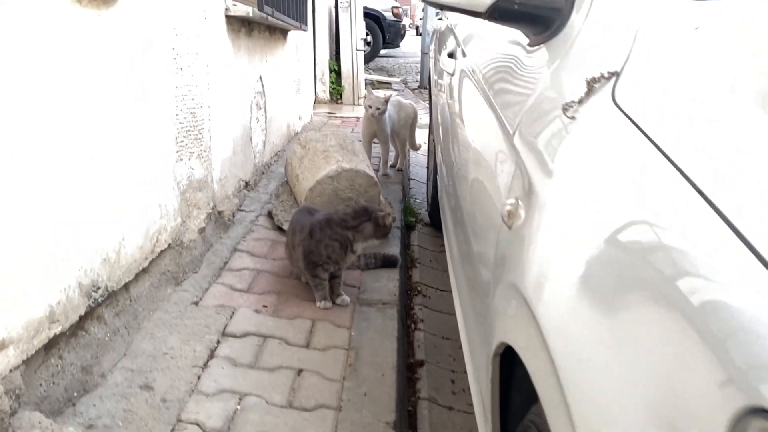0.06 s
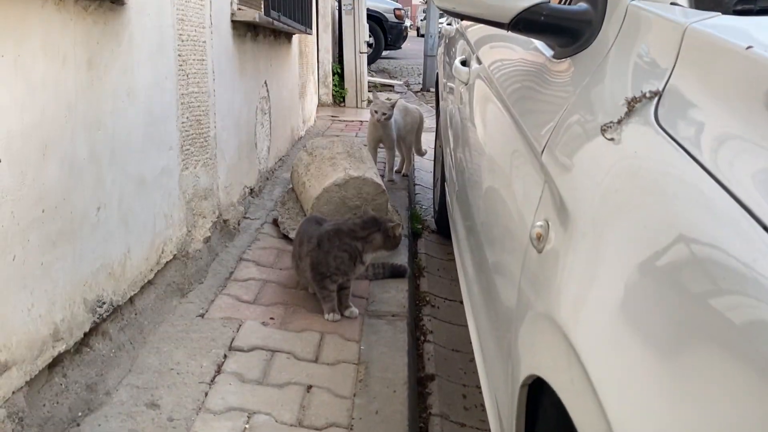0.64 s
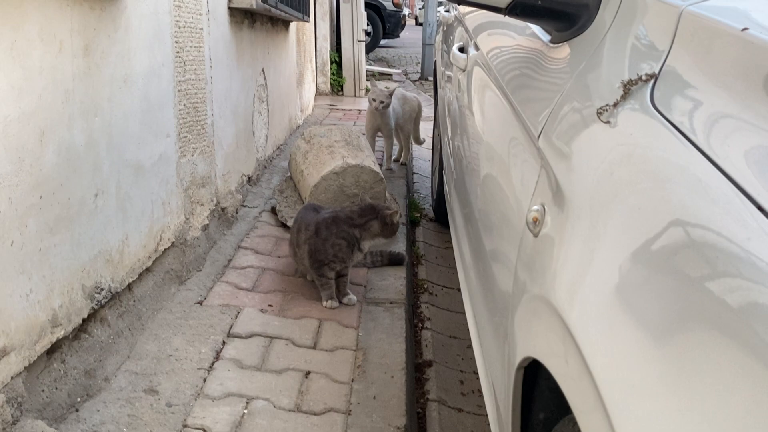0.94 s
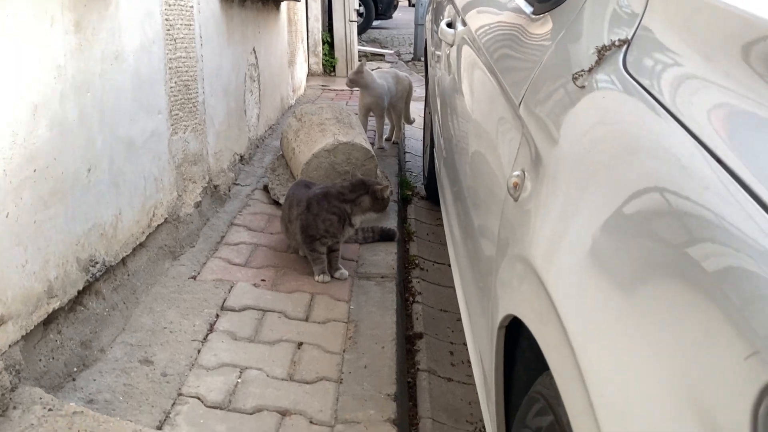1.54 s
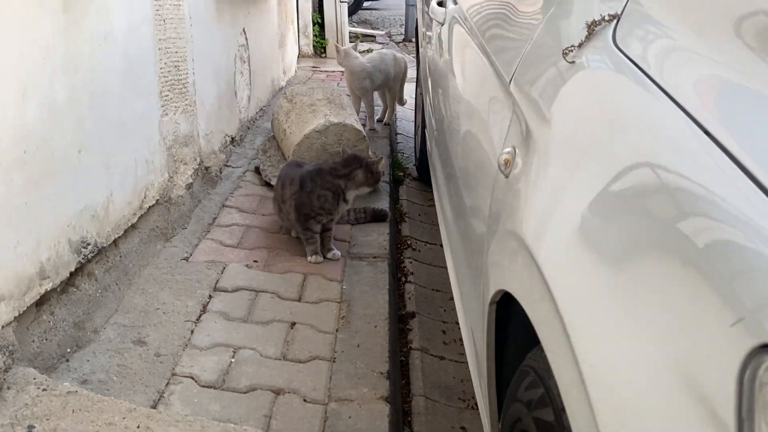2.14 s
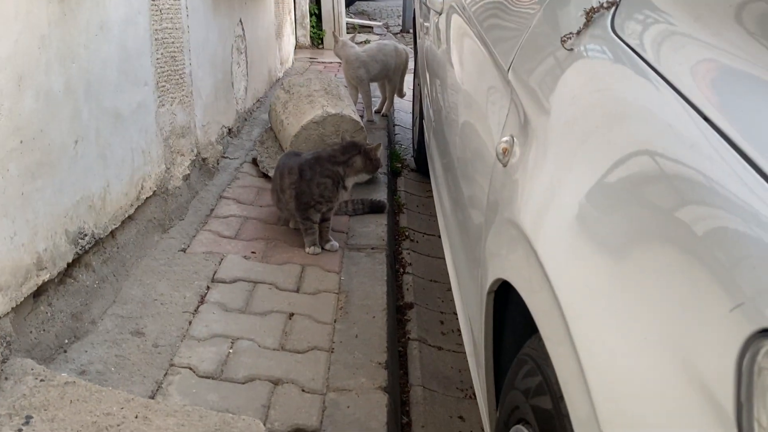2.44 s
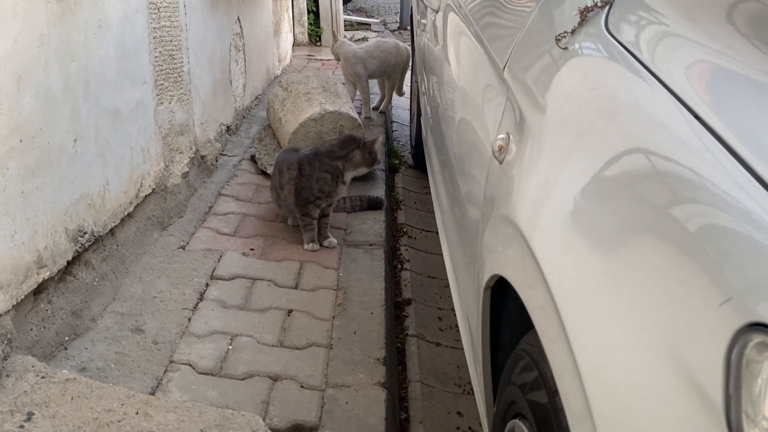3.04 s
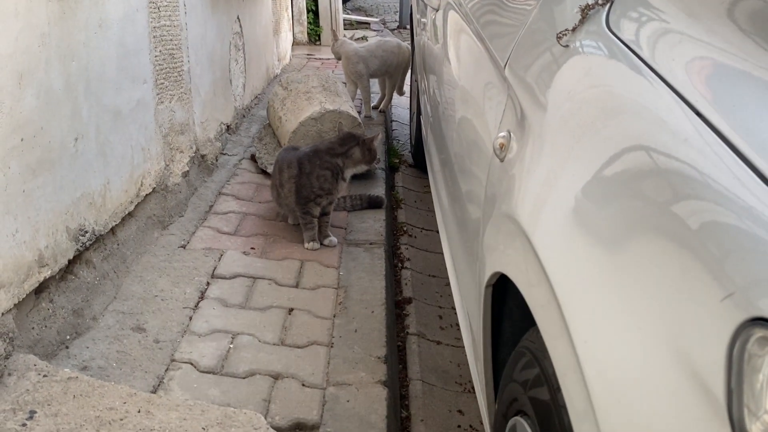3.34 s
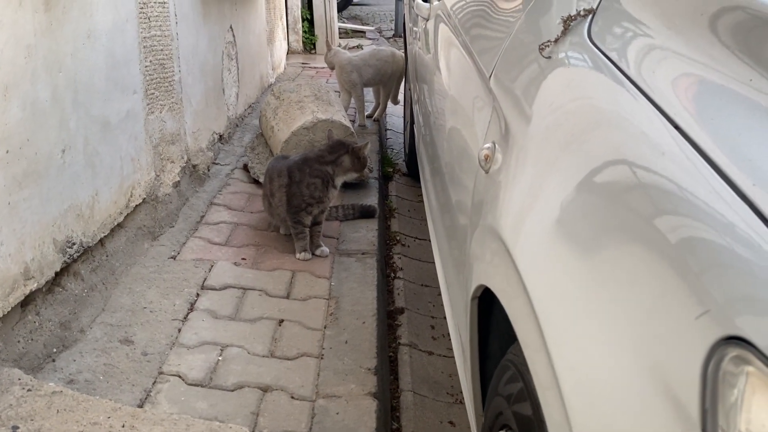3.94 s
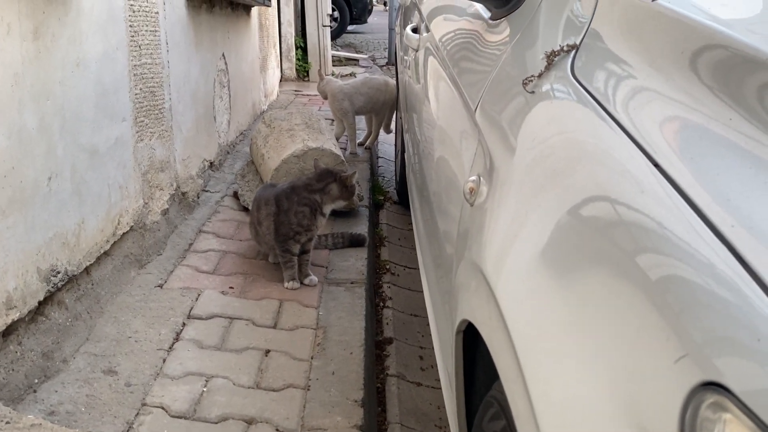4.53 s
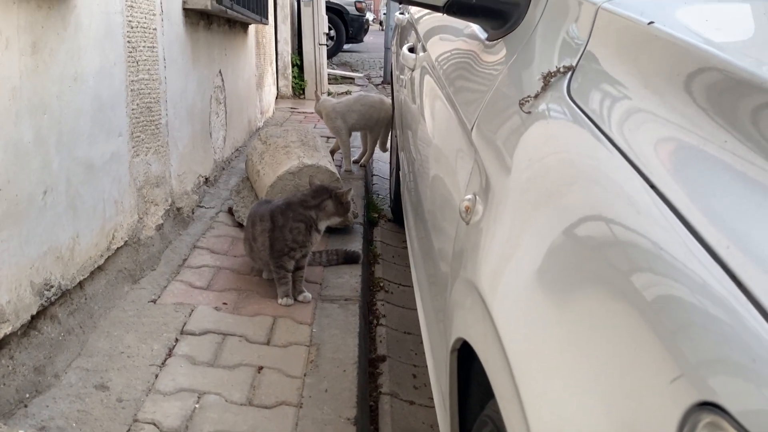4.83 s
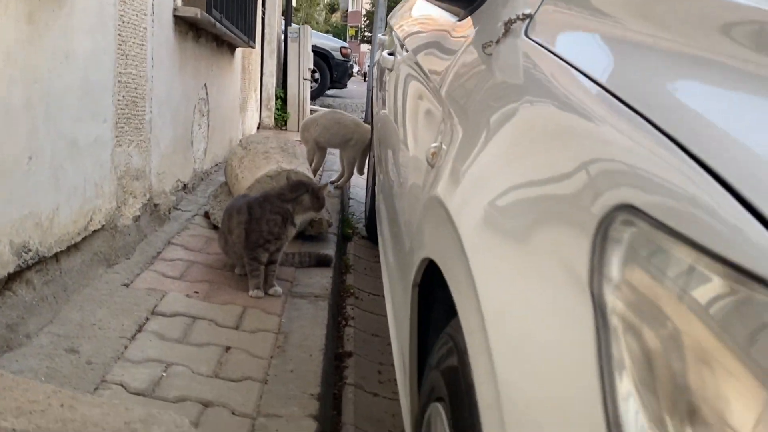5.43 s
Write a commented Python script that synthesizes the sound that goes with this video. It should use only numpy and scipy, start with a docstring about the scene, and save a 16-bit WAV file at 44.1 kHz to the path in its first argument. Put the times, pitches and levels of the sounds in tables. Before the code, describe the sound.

Low town traffic rumbles throughout, swelling and easing under a faint hiss. At about 0.5 seconds a street cat, nearby and slightly left, starts a long yowl at a rival. It slides quickly upward, then holds a wavering pitch with raspy cracks. Around 1.8 seconds there is a soft, dull bump, and the yowl sinks into a lower, muffled hoot that ends near 2.7 seconds. In the pause the traffic dips briefly, and a few faint bumps and scuffs are heard. At about 4 seconds a second yowl starts abruptly with a small bump, sweeping up to a slightly higher, brighter tone. It is hoarse in places, peaks near 4.7 seconds and eases down a little, lasting until the end at about 5.6 seconds. The narrow gap between a house wall and a parked car adds a short echo to both calls.

```python
"""In the narrow gap between a house wall and a parked car, a street cat yowls twice at a rival.
Its vocal folds buzz, making a note plus harmonics (multiples of its pitch) that mouth and throat shape.
Each yowl slides up and rasps while the mouth is wide; the first sinks to a hoot as the mouth closes.
The close walls add a short echo. Town traffic rumbles behind, with a few soft bumps and scuffs."""
import sys
import numpy as np
from scipy import signal
from scipy.fft import rfft, irfft, next_fast_len
from scipy.io import wavfile
from scipy.ndimage import uniform_filter1d, map_coordinates

SR = 44100
rng = np.random.default_rng(int(sys.argv[2]) if len(sys.argv) > 2 else 0)


def log_audio(samples):
    """Write samples as a 16-bit WAV file to the path given in sys.argv[1]."""
    # one column per channel
    frames = np.atleast_2d(samples).T
    # limit to full scale, then quantise
    limited = np.clip(frames, -1, 1)
    pcm = np.round(limited * 32767).astype(np.int16)
    wavfile.write(sys.argv[1], SR, pcm)


N = 246078

# The tune of each yowl: time_s, pitch_hz
FIRST_TUNE = [(.54, 278.2), (.66, 461.3), (.7, 520), (.76, 543), (.796, 531), (.838, 563), (.856, 549),
              (.882, 581), (.93, 584.3), (.944, 559.7), (.964, 552.3), (.994, 579.5), (1.012, 564.4),
              (1.024, 577.2), (1.222, 599.8), (1.324, 591.3), (1.364, 607.4), (1.382, 591), (1.48, 589.6),
              (1.518, 601.5), (1.55, 585.7), (1.598, 613), (1.634, 611.5), (1.658, 582), (1.728, 604),
              (1.79, 591.4), (1.85, 544), (1.97, 506.2), (2.12, 440.7), (2.38, 466.2), (2.55, 442.8),
              (2.68, 358.4)]
SECOND_TUNE = [(3.97, 257.7), (4.064, 507.5), (4.11, 538), (4.16, 572.5), (4.305, 586.6), (4.43, 610),
               (4.596, 647), (4.624, 657.3), (4.74, 662), (4.92, 656.3), (5.05, 637), (5.3, 601.2),
               (5.38, 592), (5.5, 583.7), (5.58, 590.4)]
# The moving jaw shifts two resonances (pitches the mouth boosts); pressing lifts harmonics 2-4:
# time_s, effort_db, mouth_hz, vowel_hz, press_db
FIRST_JAW = [(0.56, -39, 800, 1850, 0), (0.659, -45.5, 920, 2055, -1), (0.711, -46, 920, 2080, -0.5),
             (0.791, -44.5, 917, 2136, -2.5), (0.859, -44, 980, 2400, 5.5), (.96, -49.5, 1094, 2400, 8),
             (1.09, -51, 1225, 2357, 5.5), (1.139, -49, 1101, 2357, -0.5), (1.351, -49, 1121, 2254, -0.5),
             (1.62, -48.5, 1088, 2264, 2), (1.675, -49.5, 1090, 2254, -2), (1.72, -46.5, 1027, 1890, 0),
             (1.781, -49.5, 878, 1685, -4), (1.812, -47, 655, 1510, -3), (1.85, -53, 522, 1445, 5),
             (2.04, -51, 456, 1221, -4), (2.15, -55.5, 427, 1000, -2.5), (2.379, -49, 542, 1042, 1),
             (2.66, -55.5, 493, 944, 0)]
SECOND_JAW = [(3.989, -45, 745, 1880, -8.5), (4.05, -44, 880, 1855, 0.5), (4.14, -45, 1062, 2175, -1),
              (4.21, -54.5, 1000, 2200, 5), (4.282, -45, 978, 2224, -1.5), (4.449, -50.5, 1292, 2463, -1.5),
              (4.519, -47, 1370, 2490, 2), (4.693, -45.5, 1394, 2434, 5.5), (4.933, -45.5, 1355, 2096, -6),
              (5.069, -47.5, 1267, 2258, -3), (5.198, -51.5, 1017, 2030, 2), (5.429, -44.5, 954, 2180, -4),
              (5.58, -41, 836, 1970, -4)]
# The throat's resonances: time_s, middle_db, lower_hz, lower_db, upper_hz, upper_db, treble_db
FIRST_RINGS = [(0.56, -84, 4174, -78, 5450, -70, -86.5), (0.63, -77.5, 4660, -76, 5380, -78, -89.5),
               (0.761, -77, 4420, -74.5, 5700, -78.5, -78.5), (0.853, -61, 4360, -71, 6150, -64.5, -80.5),
               (0.879, -75, 4505, -70, 6380, -71, -79.5), (0.949, -61, 4610, -63.5, 6460, -66, -80.5),
               (1.04, -59, 4740, -64.5, 6360, -73, -77), (1.103, -63, 4702, -64, 6520, -62, -77),
               (1.15, -65.5, 4480, -71, 6300, -80, -78), (1.21, -68, 4700, -67, 5904, -79, -77.5),
               (1.28, -75, 4660, -65, 5630, -62, -78.5), (1.37, -71, 4760, -60, 5590, -63.5, -82),
               (1.5, -69.5, 4640, -61, 5460, -66.5, -80.5), (1.668, -71, 4650, -60, 5577, -70, -82),
               (1.83, -80, 4530, -79, 5450, -85, -95), (1.86, -78, 4390, -85.5, 5400, -100, -107)]
SECOND_RINGS = [(3.99, -87, 4600, -71.5, 5820, -79, -81), (4.061, -85, 3980, -75, 6200, -74, -82),
                (4.135, -73, 3950, -65, 6300, -69.5, -78), (4.287, -75, 4240, -69, 6400, -69.5, -75.5),
                (4.385, -58.5, 3760, -67.5, 5460, -65, -73), (4.462, -67, 4318, -51.5, 6580, -73, -75.5),
                (4.51, -78, 4390, -56, 6460, -69, -65), (4.658, -68.5, 4590, -52.5, 5410, -76, -68.5),
                (4.721, -67.5, 4630, -54, 6090, -78.5, -68), (4.881, -67.5, 4630, -52, 5260, -72.5, -70.5),
                (5.047, -75, 4533, -62, 6420, -60, -73), (5.226, -82, 4700, -67.5, 5500, -65.5, -81.5),
                (5.401, -72, 4560, -69, 5540, -66.5, -80), (5.56, -73.5, 4410, -67, 5430, -73, -85.5)]
# The voice cracks into a growl: time_s, half_length_s, added_rasp, added_doubling, growl_hz, growl_db
VOICE_CRACKS = [(0.659, 0.076, 0.27, 0, 870, -52.5), (0.848, 0.023, 0.2, .12, 980, -45),
                (0.936, 0.025, 0.17, 0.5, 1042, -47), (1.005, 0.027, .22, 0, 2590, -60),
                (1.034, 0.06, 0, 0.01, 1112, -43.5), (1.521, 0.026, .25, 0.2, 941, -48),
                (1.643, 0.053, .18, 0.25, 1015, -52), (4.043, 0.035, 0.4, 0, 850, -50.5),
                (4.107, 0.05, 0.35, 0, 1028, -40), (4.412, 0.18, 0.02, 0.4, 1058, -71.5),
                (4.265, 0.04, 0.2, 0, 2426, -62), (4.54, .02, .15, 0.19, 4020, -64.5),
                (4.622, 0.041, .28, 0.2, 1690, -56), (4.736, 0.05, 0.11, 0.14, 1720, -55),
                (4.96, 0.051, 0, 0.01, 2400, -62), (5.321, 0.052, 0.2, 0.03, 938, -70)]
# One harmonic briefly swells or drops out: time_s, half_length_s, harmonic_number, change_db
HARMONIC_SWELLS = [(0.634, .015, 1, -5.5), (0.699, 0.03, 4, 6), (1.24, 0.031, 4, 1), (0.96, 0.13, 3, -5.5),
                   (1.094, 0.018, 2, 6.5), (1.21, 0.022, 2, 7.5), (1.649, 0.011, 2, 4.5),
                   (4.096, 0.028, 4, 1.5), (4.258, 0.019, 2, 8), (4.261, 0.092, 3, 9),
                   (4.322, .015, 2, -15), (4.412, 0.037, 3, 13), (4.51, 0.039, 4, 2),
                   (4.583, 0.021, 4, -19.5), (4.757, 0.064, 4, -2), (4.854, .04, 2, 6), (4.86, .06, 4, -2),
                   (4.87, 0.053, 3, 3), (5.024, 0.037, 1, -7.5), (5.31, .05, 2, 2), (5.455, 0.055, 4, 7)]
# Resonances at the very top of the voice: pitch_hz, half_width_hz, relative_to_treble_db
TOP_RINGS = [(10260, 150, -11), (11800, 400, -12), (14600, 350, -14.5)]
# High hiss that sounds with each yowl, with gaps near 9 and 13 kHz: pitch_hz, relative_level_db
YOWL_HISS = [(4000, -23.5), (7000, 19), (8000, -8), (9300, -26.5), (10200, 4.5), (12000, 8), (13200, -3),
             (14600, -0.5), (15700, -9.5)]
# Reflections from wall and car partly cancel the narrow pitches; the broad dip near 1650 Hz comes from the
# nose: pitch_hz, half_width_hz, change_db
VOICE_DIPS = [(606, 5.3, -11.5), (1176.8, 8.8, -4), (1229.4, 5.7, -10), (1650, 196, -10.5),
              (1894, 13, -11.5)]
# Wall and car send each pitch from its own side: pitch_hz, left_louder_ratio, left_earlier_ratio
DIRECTIONS = [(300, 0.3, .3), (465, 0, 0.52), (585, 0.94, 0.63), (662, 0.13, -0.15), (920, 0.49, 0.53),
              (1162, 0.57, -0.38), (1367, -0.2, 1), (1870, -0.079, 0.27), (2480, 0.052, 0.19),
              (4940, 0.11, -0.2), (7600, -0.04, 0.32), (10000, 0, 1)]
# How long the echo takes to fade by 60 dB: pitch_hz, fade_s
ECHO_FADES = [(200, 0.13), (1500, 0.61), (5000, 0.027), (12000, 0.0076)]
# Soft bumps: start_s, level_db, starting_pitch_hz, length_s
SOFT_BUMPS = [(1.8057, -22, 1310, 0.084), (1.89, -34.5, 1025, 0.024), (2.206, -36, 598.7, 0.014),
              (2.884, -29, 1400, 0.0051), (3.971, -49, 447, 0.016), (4.017, -24, 1050, 0.0038),
              (5.018, -30, 1260, 0.0024)]
# Short scuffs, clicks and rustles, plus two faint swells of high hiss:
# time_s, peak_db, pitch_hz, half_length_s, pitch_spread_log_ratio
SMALL_NOISES = [(2.787, -63, 2474, 0.041, .08), (3.078, -60, 2260, .008, .15),
                (3.707, -61, 2200, 0.011, 0.3), (3.92, -65, 2700, 0.0091, 0.088),
                (3.165, -48.5, 1050, 0.0038, 0.18), (3.188, -56, 1200, 0.026, 0.29),
                (4.016, -55.5, 9200, .001, 1), (5.014, -49, 11400, 0.00057, 0.88),
                (5.059, -56, 6470, 0.0027, 0.98), (2.19, -64, 5150, 0.068, 0.43),
                (2.46, -72, 6430, 0.072, 0.42)]
# Traffic rising and falling: time_s, rumble_db, murmur_db
TRAFFIC_LEVELS = [(0, -42, -58), (.9, -44, -52.5), (2.5, -45, -53.5), (2.87, -43, -53.5),
                  (2.97, -57.5, -59), (3.25, -55, -57), (3.4, -48, -60), (3.87, -41.5, -56.5),
                  (4.18, -53.5, -62), (4.4, -45.5, -55), (4.75, -45.5, -53), (5.58, -46.5, -52)]
# The deep rumble of traffic and the wider roar of the town: pitch_hz, relative_level_db
RUMBLE_SPECTRUM = [(15, -32), (25, -26.5), (48, 1.5), (70, 4), (119, -6), (161, -29), (170, -12),
                   (220, -30.5), (370, -120)]
ROAR_SPECTRUM = [(82, -21.5), (140, 0.5), (161, -12.5), (192, -8), (234, -5), (268, -12.5), (375, -15),
                 (504, -17), (718, -21), (892, -22), (1040, -24.5), (1740, -28.5), (4750, -46),
                 (15500, -64.5)]
# How alike the street sounds at both ears: pitch_hz, likeness (1 the same, -1 opposite)
EAR_LIKENESS = [(60, 0.98), (180, 0.93), (550, 0.59), (1650, 0.14), (4970, 1), (9000, -0.89), (15000, 1)]

SHUT_HZ, OPEN_HZ = 544, 940  # lowest mouth resonance with the jaw shut and open
MIDDLE_RING_HZ, TREBLE_RING_HZ = 3060, 7560  # two throat resonances that stay put


def yowl(tune, jaw, throat, hoarse, brighten_s, attack_s, waver=0.0036, quaver=0.0077):
    """One call: the vocal folds buzz along a tune, and strain makes their cycles uneven."""
    span = np.arange(int(tune[0][0] * SR), min(N, int(tune[-1][0] * SR)))
    t = span / SR
    note_hz, = curves(tune, t)
    _, mouth_hz, _, _ = curves(jaw, t)
    rasp, doubling = strain(mouth_hz, hoarse, t)
    shake = waver * wobble(17, t) + quaver * wobble(39.7, t) + 0.0083 * wobble(420, t)
    pitch_hz = note_hz * (1 + rasp * shake)
    phase = 2 * np.pi * np.cumsum(pitch_hz) / SR
    voice = vowel(vowel_levels(note_hz, jaw, brighten_s, t), pitch_hz, phase, rasp, t)
    unmuted = np.clip((mouth_hz - SHUT_HZ) / 280, 0, 1)  # a shut jaw lets no overtones out
    voice += unmuted * overtones(throat, pitch_hz, phase, rasp, t)
    voice *= 1 + 0.37 * rasp * wobble(130, t)  # the folds catch and let go
    voice += doubling * in_between_tones(pitch_hz, phase, mouth_hz, t)
    voice += growl(mouth_hz, rasp, t)
    fade_in, fade_out = (t - t[0]) / attack_s, (t[-1] - t) / 0.00072
    out = np.zeros(N)
    out[span] = voice * np.clip(np.minimum(fade_in, fade_out), 0, 1)
    return out


def strain(mouth_hz, hoarse, t):
    """Rasp and doubling (every second cycle differs) grow as the jaw opens or the voice cracks."""
    opening = np.clip((mouth_hz - SHUT_HZ) / (OPEN_HZ - SHUT_HZ), 0, 1)
    rasp, doubling = hoarse * opening, 0.098 * opening
    for time_s, half_length_s, added_rasp, added_doubling, _, _ in VOICE_CRACKS:
        flare = swell(t, time_s, half_length_s)
        rasp += added_rasp * flare
        doubling += added_doubling * flare
    return rasp, doubling


def vowel_levels(note_hz, jaw, brighten_s, t, fold_db_per_octave=-8):
    """Mouth and walls boost or weaken the four lowest harmonics; gives their levels in dB."""
    effort_db, mouth_hz, vowel_hz, press_db = curves(jaw, t)
    hz = np.arange(1, 5)[:, None] * note_hz
    dullness = 10 * np.exp(-((t - t[0]) / brighten_s) ** 4)  # each call starts dull
    levels_db = effort_db + (fold_db_per_octave - dullness) * np.log2(hz / note_hz)
    levels_db += sum(db * bell(hz, centre, width) for centre, width, db in VOICE_DIPS)
    levels_db += resonance_db(hz, mouth_hz, width_hz=122.4) + resonance_db(hz, vowel_hz, width_hz=86)
    levels_db[1:] += press_db
    for time_s, half_length_s, harmonic, change_db in HARMONIC_SWELLS:
        levels_db[round(harmonic) - 1] += change_db * swell(t, time_s, half_length_s)
    return levels_db


def vowel(levels_db, pitch_hz, phase, rasp, t):
    """The low harmonics carry the vowel; the higher one is, the more it flutters and rasps."""
    out = np.zeros(len(t))
    for k, level_db in enumerate(levels_db, 1):
        flutter_db = 1.5 * k * rasp * wobble(45.8, t)
        drift_db = 2 * (k > 2) * wobble(14.06, t)
        tone = np.sqrt(2) * np.sin(k * phase)
        noise = 0.057 * k * rasp * ringing(k * pitch_hz, 300, t)
        out += amp(level_db + flutter_db + drift_db) * (tone + noise)
    return out


def overtones(throat, pitch_hz, phase, rasp, t, half_width_hz=230, hoarse_s=0.16):
    """Harmonics 5-25 and puffs of air ring the throat; strain makes them sputter and blur."""
    middle_db, lower_hz, lower_db, upper_hz, upper_db, treble_db = curves(throat, t)
    numbers = np.arange(5, 26)
    onset = swell(t, t[0], hoarse_s)  # a call starts hoarse
    blur = 0.35 + rasp + 0.89 * onset
    harmonics = []
    for k in numbers:
        flicker_db = 2 * wobble(10.5, t) + (1 + 6 * rasp) * wobble(110, t)
        smear = (k / 10) ** 2 * blur * wobble(220, t)  # uneven cycles smear high harmonics most
        harmonics.append(amp(flicker_db) * np.sin(k * phase + smear))
    air_share = np.clip(0.008 + 0.28 * rasp + 0.43 * onset, 0, 0.9)
    puffs = unit(1 + np.cos(phase) / 2) * amp(2 * wobble(35, t))  # one puff of air per cycle
    rings = [(MIDDLE_RING_HZ, half_width_hz, middle_db), (lower_hz, half_width_hz, lower_db),
             (upper_hz, half_width_hz, upper_db), (TREBLE_RING_HZ, half_width_hz, treble_db - 0.5)]
    rings += [(hz, width, treble_db + db) for hz, width, db in TOP_RINGS]
    out = np.zeros(len(t))
    for centre_hz, width, db in rings:
        weights = bell(numbers[:, None] * pitch_hz, centre_hz, width)
        tone = np.sqrt(2) * np.sum(weights * harmonics, axis=0) / np.linalg.norm(weights, axis=0)
        air = puffs * ringing(centre_hz, 2400, t)
        out += amp(db - 2.5) * (np.sqrt(1 - air_share) * tone + np.sqrt(air_share) * air)
    hiss = unit(filtered(rng.standard_normal(N), lambda hz: amp(along(YOWL_HISS, hz))))
    return out + amp(treble_db - 9) * puffs * hiss[:len(t)]


def in_between_tones(pitch_hz, phase, mouth_hz, t):
    """When every second cycle of the folds differs, tones appear halfway between the harmonics."""
    halves = np.arange(1, 5)[:, None] + 0.5
    hz = halves * pitch_hz
    mouth_gain = bell(hz, 0.93 * mouth_hz, 120) + amp(-8) * bell(hz, 2300, 210)
    sputter_db = 4 * wobble(22, t)
    tones = np.sin(halves * phase + wobble(60, t))
    return amp(-42 + sputter_db) * np.sum(mouth_gain * tones, axis=0)


def growl(mouth_hz, rasp, t):
    """Chaotic cycles ring the mouth as rough noise, with an extra burst at each crack of the voice."""
    out = amp(-54) * rasp * (ringing(0.82 * mouth_hz, 330, t) + amp(-8) * ringing(2300, 650, t))
    for time_s, half_length_s, _, _, hz, db in VOICE_CRACKS:
        out += amp(db) * swell(t, time_s, half_length_s) * ringing(hz, 0.18 * hz, t)
    return out


def wall_bounce(voice):
    """The cat sits a little to the left; close walls throw each pitch to its own side."""
    pitch_hz, louder, earlier = np.transpose(DIRECTIONS)
    side = filtered(voice, lambda hz: np.interp(hz, pitch_hz, louder + 1j * earlier))
    return np.array([voice + side, voice - side])


def alley_echo(voice, delay_samples=200):
    """Wall, paving and car return a fading echo, different at each ear."""
    hz, t, noise = signal.stft(rng.standard_normal((2, SR // 2)), SR, nperseg=256)
    fade = amp(-60 * t / along(ECHO_FADES, hz)[:, None])
    tail = signal.istft(noise * fade, SR, nperseg=256)[1]
    delayed = np.pad(voice, (delay_samples, 0))[None]
    return signal.fftconvolve(delayed, tail / np.linalg.norm(tail[0]), axes=1)[:, :N]


def bumps(glide_s=0.0011, rise_s=0.00074, muffle_hz=1300):
    """Each bump is a dull thud whose pitch drops within milliseconds."""
    out, t = np.zeros(N + SR), np.arange(SR // 5) / SR
    for start_s, level_db, pitch_hz, length_s in SOFT_BUMPS:
        phase = 2 * np.pi * pitch_hz * glide_s * np.log1p(t / glide_s)
        loudness = amp(level_db) * (1 - swell(t, 0, rise_s)) * swell(t, 0, length_s)
        out[round(start_s * SR):][:len(t)] += loudness * np.sin(phase)
    return filtered(out[:N], lambda hz: 1 / (1 + (hz / muffle_hz) ** 8))


def small_noises():
    """Brief bursts of noise: scuffs, clicks, rustles and two faint swells of high hiss."""
    out, t = np.zeros(N), np.arange(N) / SR
    for time_s, peak_db, pitch_hz, half_length_s, spread in SMALL_NOISES:
        burst = rng.standard_normal(N) * swell(t, time_s, half_length_s)
        band = filtered(burst, lambda hz: swell(np.log((hz + 1) / pitch_hz), 0, spread))
        out += amp(peak_db) * band / np.max(np.abs(band))
    return out


def traffic(hum_hz=188):
    """Traffic rumbles and murmurs in swells, over a far hiss and a faint, unsteady engine hum."""
    t = np.arange(N) / SR
    rumble_db, murmur_db = curves(TRAFFIC_LEVELS, t)
    rumble = amp(rumble_db + 2 + wobble(3.286, t)) * street_noise(RUMBLE_SPECTRUM)
    roar = patchy(street_noise(ROAR_SPECTRUM), depth_db=2.16)
    murmur = filtered(roar, lambda hz: 1 / (1 + (hz / 600) ** 2))
    hiss = roar - murmur
    hum = amp(-63 + wobble(1, t)) * np.sin(2 * np.pi * hum_hz * t + wobble(8.4, t))
    return rumble + amp(murmur_db + 2) * murmur + amp(-52) * hiss + hum


def street_noise(spectrum):
    """A stereo rush of noise whose bass is nearly the same at both ears."""
    def gains(hz):
        angle = np.arccos(np.clip(along(EAR_LIKENESS, hz), -1, 1)) / 2
        return amp(along(spectrum, hz)) * [np.cos(angle), np.sin(angle)]
    shared, side = filtered(rng.standard_normal((2, N)), gains)
    return unit(np.array([shared + side, shared - side]))


def patchy(sound, depth_db):
    """Makes random patches of time and pitch a little louder or softer."""
    grid = signal.stft(sound, nperseg=512)[2]
    patches = uniform_filter1d(rng.standard_normal(grid.shape[1:]), size=5, axis=0)
    patches = uniform_filter1d(patches, size=14, axis=1)
    return unit(signal.istft(grid * amp(depth_db * unit(patches)), nperseg=512)[1][:, :N])


def ringing(centre_hz, band_hz, t):
    """Noise gathered around one pitch, like a resonance shaken at random."""
    shaking = wobble(band_hz, t) + 1j * wobble(band_hz, t)
    cycles = np.cumsum(np.broadcast_to(centre_hz, t.shape)) / SR
    return np.real(shaking * np.exp(2j * np.pi * cycles))


def resonance_db(hz, centre_hz, width_hz):
    """A mouth resonance passes low pitches, boosts those near its centre and weakens high ones."""
    return -10 * np.log10((1 - (hz / centre_hz) ** 2) ** 2 + (hz * width_hz / centre_hz ** 2) ** 2)


def bell(hz, centre_hz, half_width_hz):
    """The hump of one resonance, 1 at its centre."""
    return 1 / (1 + ((hz - centre_hz) / half_width_hz) ** 2)


def swell(x, centre, half_width):
    """A smooth rise to 1 at the centre and back to 0."""
    return np.exp(-((x - centre) / half_width) ** 2)


def wobble(rate_hz, t):
    """A smooth curve through rate_hz random values a second."""
    steps = (t - t[0]) * rate_hz
    return map_coordinates(rng.standard_normal(int(steps[-1]) + 4), [steps])


def curves(table, t):
    """Each column after the first, read at the times t."""
    time_s, *columns = np.transpose(table)
    return [np.interp(t, time_s, column) for column in columns]


def along(table, hz):
    """Reads a table by pitch, with octaves evenly spaced."""
    pitch_hz, values = np.transpose(table)
    return np.interp(np.log(hz + 1), np.log(pitch_hz), values)


def filtered(sound, gain_at):
    """Scales each frequency of a sound by gain_at(hz)."""
    size = next_fast_len(N + SR // 2)
    return irfft(rfft(sound, size) * gain_at(np.fft.rfftfreq(size, 1 / SR)), size)[..., :N]


def amp(db):
    """Turns decibels into a multiplier."""
    return 10 ** (np.asarray(db) / 20)


def unit(x):
    """Scales x to an average strength (rms) of 1."""
    return x / np.sqrt(np.mean(x ** 2) + 1e-20)


def scene(echo_db=-17):
    """Two yowls between close walls, with bumps, small noises and traffic."""
    cat = yowl(FIRST_TUNE, FIRST_JAW, FIRST_RINGS, hoarse=0.19, brighten_s=0.092, attack_s=0.064)
    cat += yowl(SECOND_TUNE, SECOND_JAW, SECOND_RINGS, hoarse=0.13, brighten_s=0.037, attack_s=0.0057,
                waver=0.0022, quaver=0.006)
    return wall_bounce(cat) + amp(echo_db) * alley_echo(cat) + bumps() + small_noises() + traffic()


def record(dry, low_cut_hz=33, top_hz=15700):
    """Takes away the deepest bass and the highest treble."""
    return filtered(dry, lambda hz: (hz < top_hz) * (1 - 1 / (1 + (hz / low_cut_hz) ** 4)))


dry = scene()
out = record(dry)
log_audio(out)
```